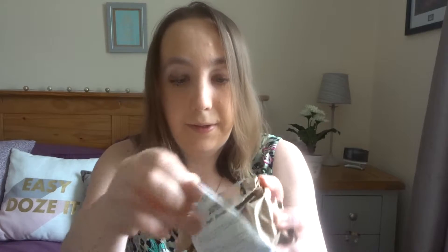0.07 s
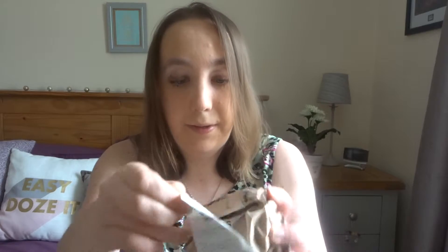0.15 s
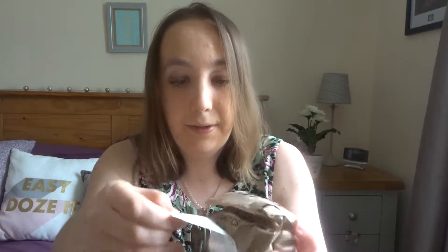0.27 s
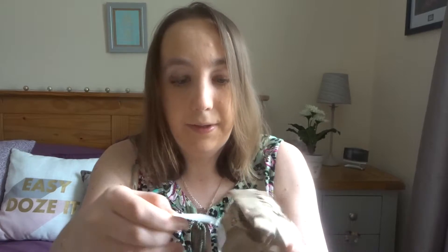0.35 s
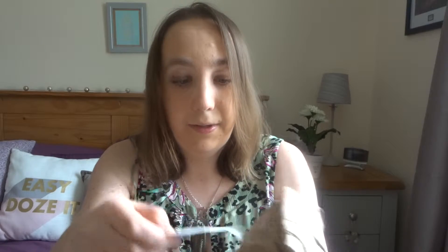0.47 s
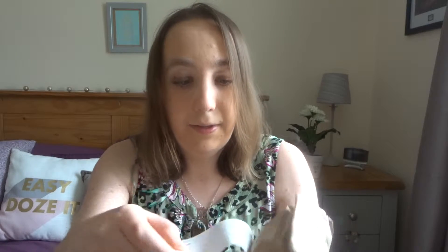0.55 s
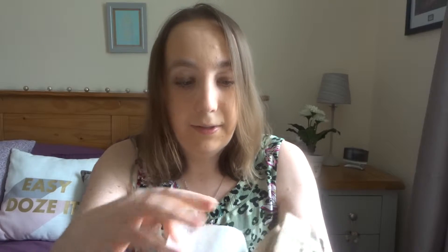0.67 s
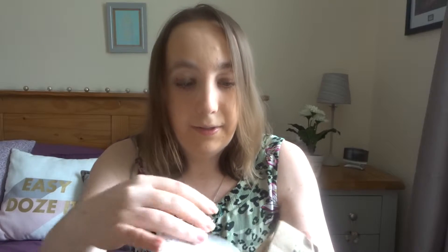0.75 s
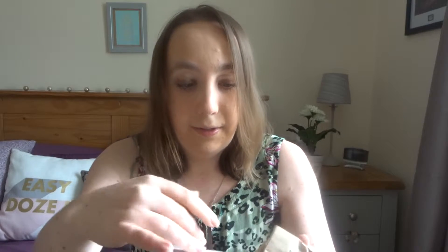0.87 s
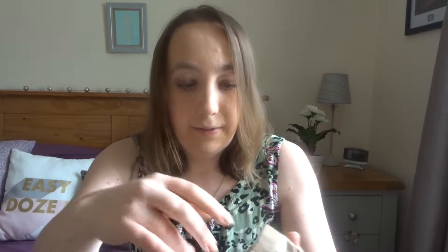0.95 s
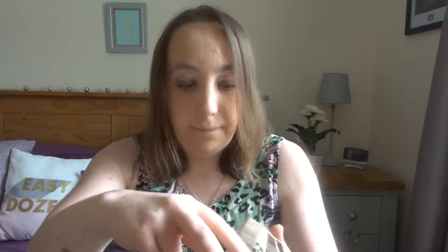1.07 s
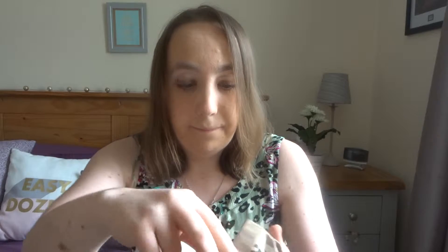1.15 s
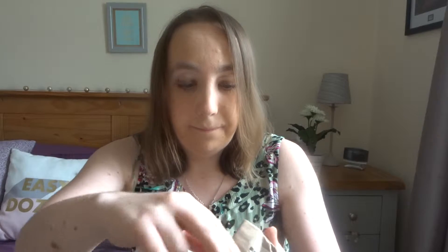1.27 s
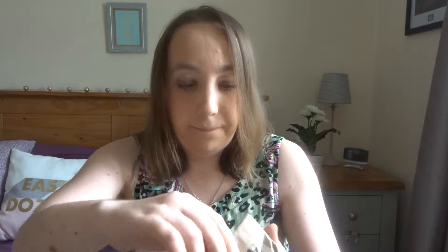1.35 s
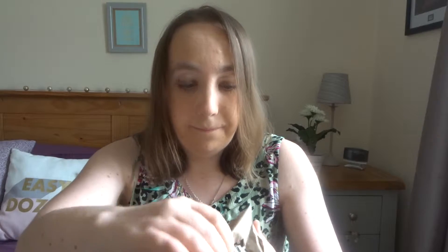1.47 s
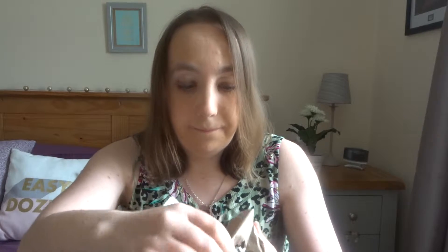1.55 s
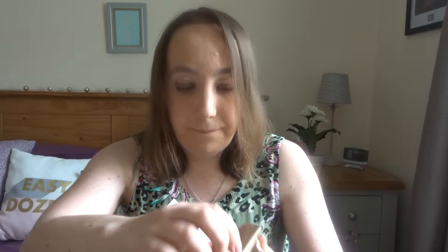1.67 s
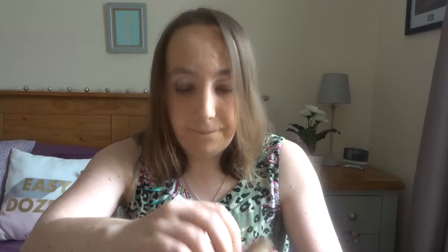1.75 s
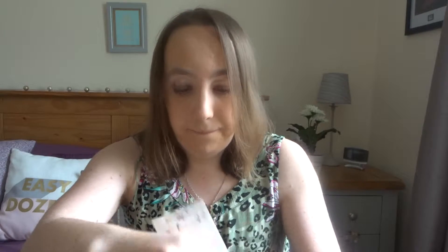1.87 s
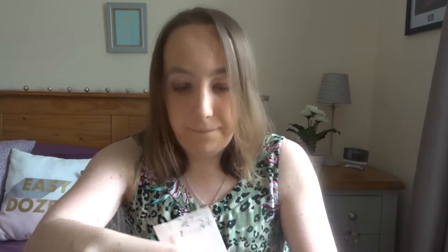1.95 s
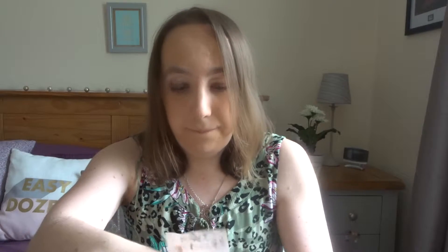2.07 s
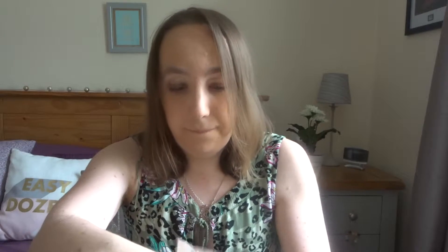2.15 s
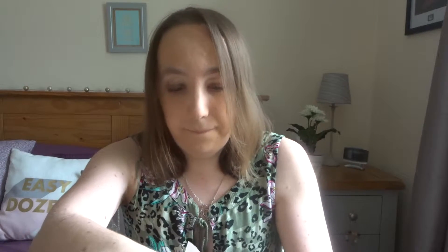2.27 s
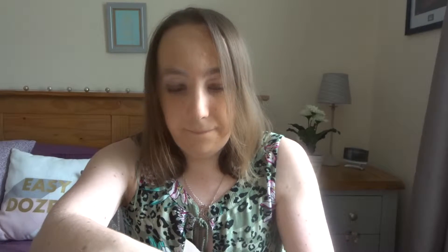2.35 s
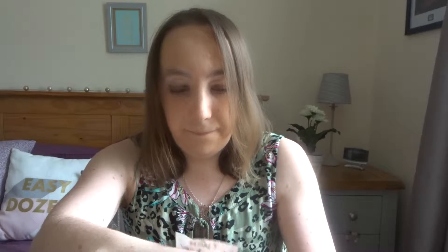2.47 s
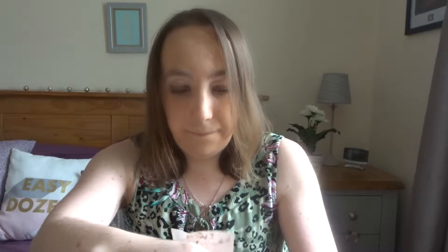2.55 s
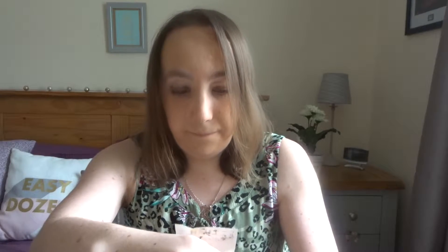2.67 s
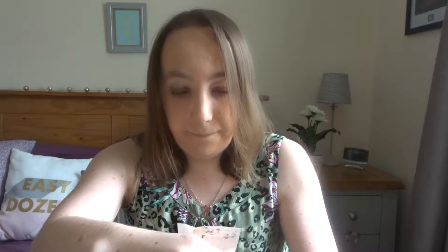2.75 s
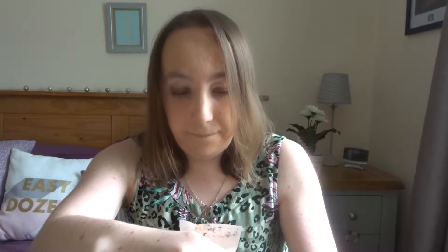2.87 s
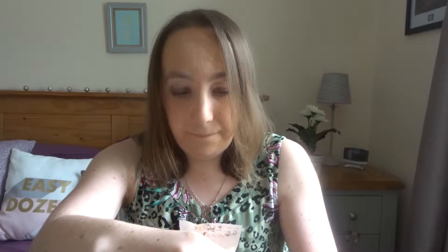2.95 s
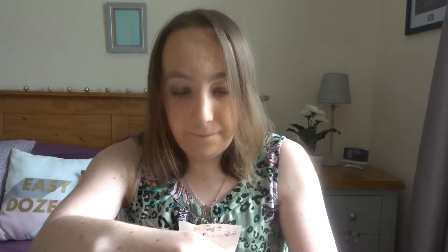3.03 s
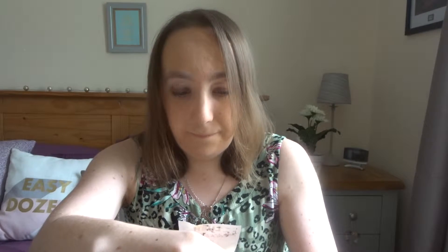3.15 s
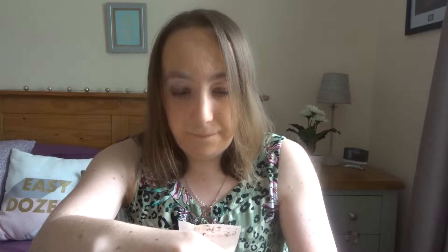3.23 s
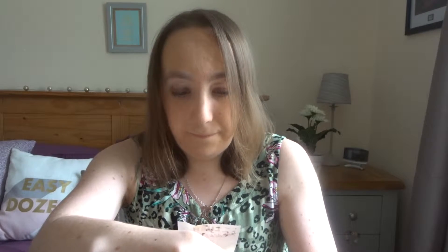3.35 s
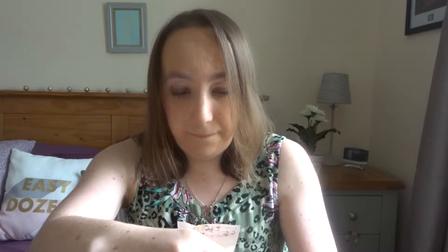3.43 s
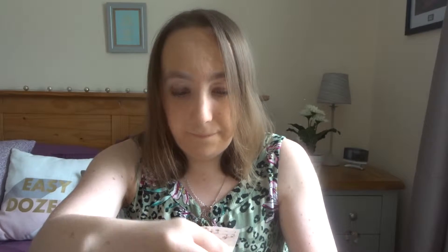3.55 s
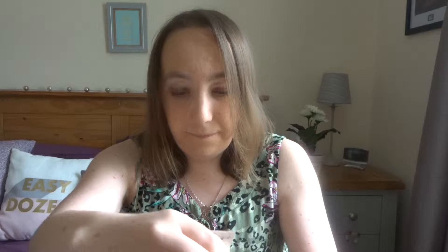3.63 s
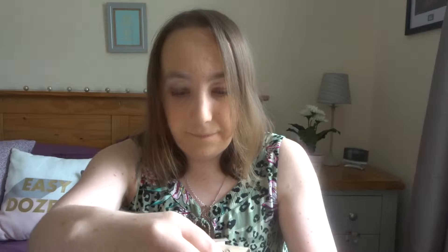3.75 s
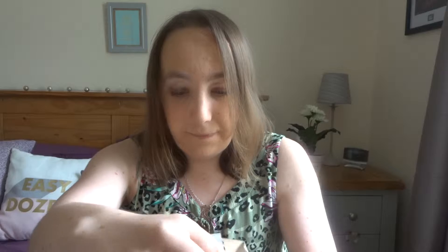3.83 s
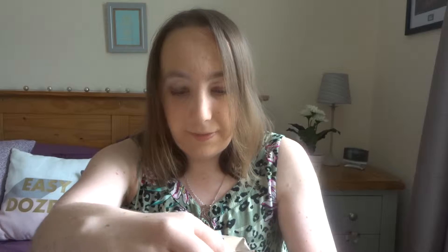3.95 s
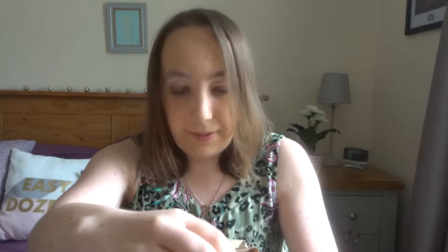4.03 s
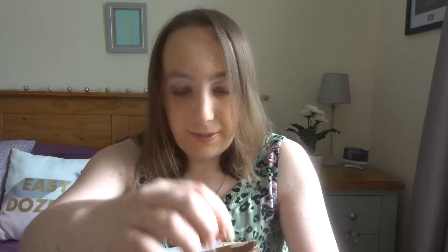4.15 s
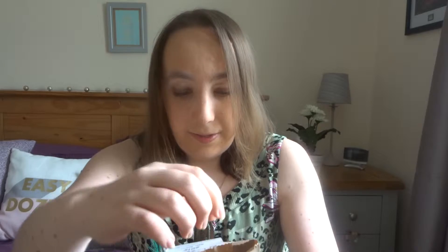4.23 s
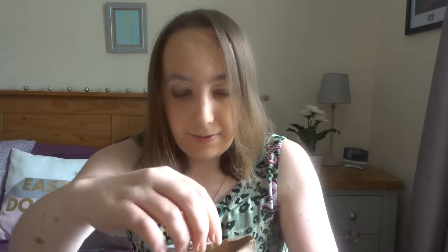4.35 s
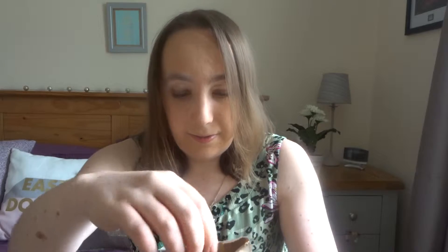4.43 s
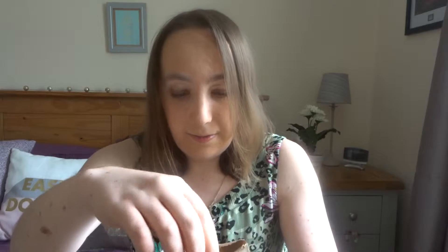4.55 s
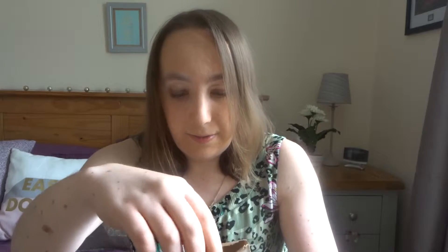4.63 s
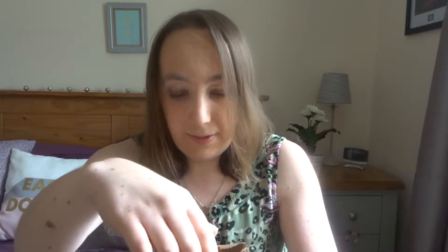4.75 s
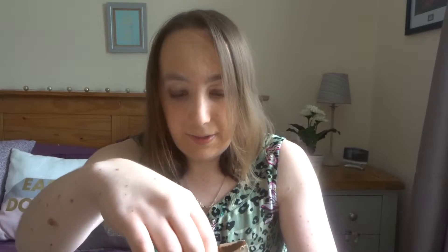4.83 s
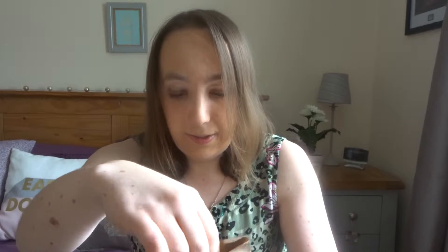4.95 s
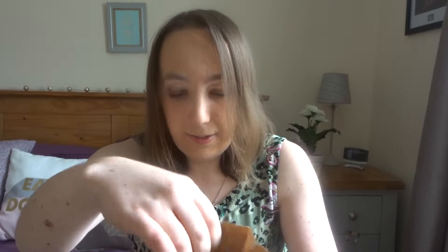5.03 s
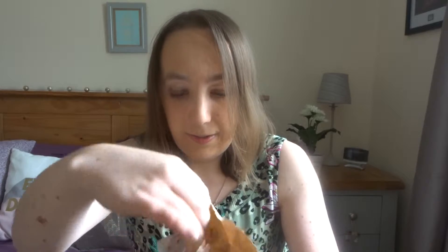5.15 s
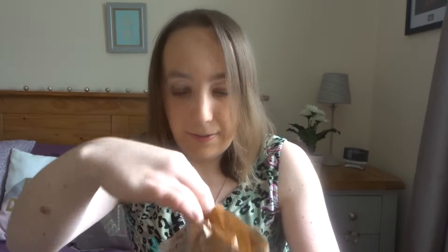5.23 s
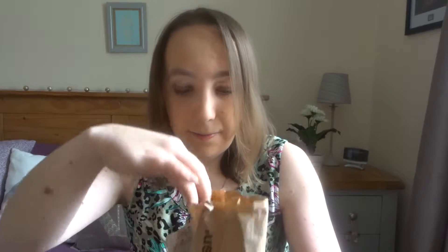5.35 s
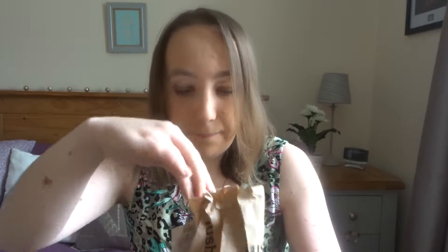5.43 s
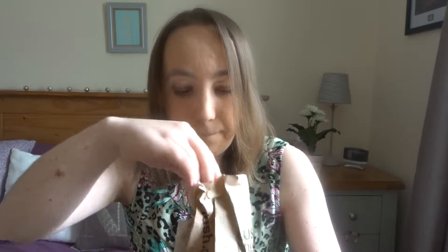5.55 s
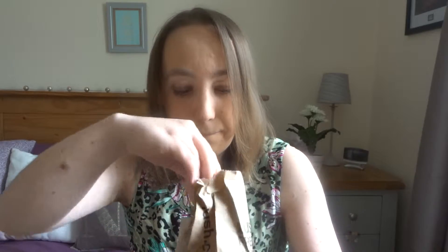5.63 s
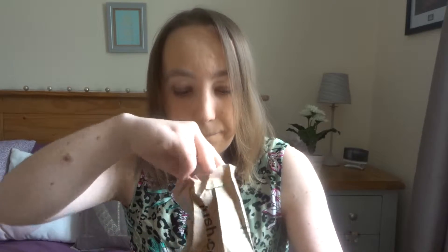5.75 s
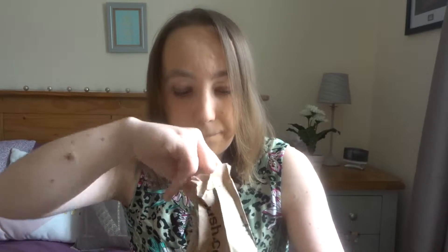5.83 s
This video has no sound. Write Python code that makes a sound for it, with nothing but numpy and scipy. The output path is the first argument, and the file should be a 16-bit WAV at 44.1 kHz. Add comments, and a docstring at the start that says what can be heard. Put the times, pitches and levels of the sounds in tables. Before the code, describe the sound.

Dry, bright paper noise: countless tiny ticks under irregular loud snaps. A busy opening gives way to scattered crinkles, then about a second of near silence with faint air and hiss. Two more flurries follow, fuller and slightly duller, with soft low thuds as the bag's sides give. Recorded close, with a short, soft room tail.

```python
"""Stiff paper bag in a bedroom

Hands open and rummage in a stiff paper bag. Creases snap as short random flutters shaped by a facet resonance;
swarms of tiny creases rustle under every squeeze, and filtered noise swells into dull bumps as a side gives way.
Desk and furnished room add early scatter and a short noise tail, over faint air and hiss; a low hum swells
once in the pause. A limiter rounds the loudest snaps."""
import sys
import numpy as np
from scipy import signal
from scipy.fft import rfft, irfft, next_fast_len
from scipy.io import wavfile
from scipy.ndimage import uniform_filter1d, minimum_filter1d

SR = 44100
rng = np.random.default_rng(int(sys.argv[2]) if len(sys.argv) > 2 else 0)


def master(y):
    """Save y as 16-bit WAV."""
    cut = np.clip(np.atleast_2d(y).T, -1, 1)
    pcm = np.round(cut * 32767)  # scale
    wavfile.write(sys.argv[1], SR, pcm.astype(np.int16))


N = 259825  # length in samples
TAPS = 512  # length of one crease in samples

# The loud buckling creases that stand out from the rustle. Each row: time in seconds, level in dB,
# resonance of the facet in Hz, brightness in dB, body in dB.
LOUD_CREASES = [(0.0082, -18.5, 2500, -7, -7.5), (0.0425, -18.5, 3140, 2, -19), (0.0586, -18, 3980, -6, -6),
                (0.0635, -17, 3760, -20, -7), (0.1028, -14.5, 2960, -18, -3),
                (0.1421, -17.5, 2600, 8.5, -6), (0.166, -28, 5870, 12, -11), (0.1729, -20.5, 1640, -2, -9),
                (0.1777, -18.5, 3330, 4, -10), (0.1909, -18.5, 2420, 9, -14), (0.2111, -17, 2630, 0, -20),
                (0.229, -18.5, 3170, 12.5, -7), (0.2769, -19.5, 2950, 3.5, 1), (0.365, -22.5, 3540, 5, -7),
                (0.3693, -16.5, 2820, 11.5, 7), (0.398, -24, 3770, 17, -12), (0.4049, -12, 1900, 13, -10),
                (0.4311, -17.5, 2000, 5, -11), (0.4462, -17.5, 4100, 10.5, -1),
                (0.4606, -17, 4100, 7.5, -13), (0.527, -23, 2600, 0, 7), (0.596, -40, 6140, 14, 17),
                (0.6022, -28.5, 3200, 0, -10), (0.6242, -36, 3250, 14, -7), (0.6834, -36, 6400, 9, 0),
                (0.7148, -36.5, 2640, 7, -7), (0.7562, -26, 1760, 8, 11.5), (0.8603, -41.5, 3920, 2, -10),
                (0.8707, -39.5, 2500, 9, -20), (0.942, -39, 3600, 7, 7), (0.993, -27.5, 3760, 15, -11),
                (1.0789, -17, 4020, -10, -31), (1.0871, -23, 2520, 11, -4), (1.2507, -27, 2530, 7.5, -7),
                (1.2806, -26.5, 2700, 0, 5), (1.342, -24.5, 2990, 13, 10.5), (1.373, -23.5, 2140, -24, -7),
                (1.403, -29, 6760, 13, -4), (1.4221, -22, 3200, 10, -8), (1.4307, -22.5, 2680, 11, 12.5),
                (1.445, -20.5, 2360, 9, -11), (1.484, -20.5, 2400, -2, -1), (1.4931, -19.5, 3060, 9, 4),
                (1.5257, -23.5, 2640, 6.5, 7.5), (1.5479, -25, 2800, 3.5, 10),
                (1.6161, -33.5, 2380, 15, -10), (1.6324, -25, 2650, -7, 17.5), (1.6384, -15, 3700, 6, -13),
                (1.7735, -22.5, 2310, 8, -22), (1.8003, -24, 2420, 0, 5), (1.8359, -27.5, 3700, -3, 4),
                (1.9191, -33.5, 5210, 12.5, -15), (1.9525, -25, 4450, 20, 10.5),
                (1.9893, -31, 1620, -9, 11), (2.049, -29.5, 2040, -20, 5), (2.1067, -19.5, 2480, -5, 1),
                (2.1312, -22.5, 2500, -3, -28), (2.4027, -23.5, 2450, 5.5, 11.5),
                (3.4958, -40, 2100, -6, 5.5), (3.5131, -38, 5300, 17.5, 15), (3.5664, -27.5, 3520, -9, 5.5),
                (3.58, -28.5, 2070, 2, 4), (3.589, -29, 2400, -11, 3), (3.616, -35.5, 3220, 1, 19),
                (3.637, -32, 1560, -12, 2), (3.6572, -28, 2170, 5, -1), (3.6625, -26, 5240, 10, 9),
                (3.6976, -21, 1740, 14.5, 1), (3.6999, -16.5, 1550, -1.5, -3), (3.7192, -18, 2020, -1, -6),
                (3.772, -29.5, 4090, 6.5, 6), (3.7859, -16, 2040, 4.5, -7), (3.8381, -15, 2000, 6.5, 9),
                (3.8607, -17.5, 2050, 3.5, 1.5), (3.8718, -15, 2090, 3.5, -6),
                (3.9557, -27, 3320, -20, 10.5), (4.0843, -37.5, 4160, 3.5, 0.5),
                (4.1355, -28.5, 2060, -8.5, 1.5), (4.4797, -30, 1960, -1.5, -15),
                (4.5937, -32.5, 1570, -23, -3), (4.7343, -37, 2010, 3, 15), (4.8155, -41, 7500, 18, 12),
                (4.8959, -32, 2120, -48, 8), (4.979, -29, 2160, 9, 9), (4.9875, -31, 1830, 5, -4),
                (5.0115, -15, 2430, 7.5, 6.5), (5.025, -24, 4840, 13, -7), (5.0384, -22.5, 2130, 14, 2),
                (5.0717, -15.5, 2400, 1, 2), (5.0771, -14, 3060, 2, 1), (5.084, -20, 2350, 15, 14),
                (5.1519, -15.5, 1540, 3, 4), (5.173, -10.5, 1990, 6.5, 5.5), (5.2457, -23.5, 2820, 6, -9),
                (5.253, -20.5, 3340, 10.5, -19), (5.299, -24.5, 3520, 5.5, -1),
                (5.338, -27, 3080, -23, 14.5), (5.4119, -26, 3470, 6, -2), (5.4294, -26, 3100, 1, 6),
                (5.4522, -23.5, 2700, 9, 4), (5.5214, -28.5, 1390, -18, 12.5),
                (5.5522, -25.5, 4800, 2.5, 8), (5.5684, -22.5, 2600, 4.5, 7), (5.6968, -18, 1830, -4, -3),
                (5.7528, -19.5, 4120, 3, 12.5), (5.773, -23.5, 2770, 0, 2), (5.8546, -23.5, 2370, -3, -5)]
# Stereo spread of sound from all around. Each row: frequency in Hz, side level against mid in dB.
DIFFUSE_WIDTH = [(100, -13), (350, -11), (700, -6.5), (1500, -7), (3500, -4), (11000, 3)]


def undb(db):
    """Amplitude ratio: every 20 dB is a factor of ten."""
    return 10 ** (np.asarray(db) / 20)


def curve(points, hz):
    """Linear interpolation of (Hz, value) points on a logarithmic frequency axis."""
    f, value = np.transpose(points)
    return np.interp(np.log(hz + 1), np.log(f), value)


def colour(x, points):
    """Linear filtering: multiply the spectrum by the gains of (Hz, dB) points."""
    size = next_fast_len(len(x) + TAPS)
    gain = undb(curve(points, np.fft.rfftfreq(size, 1 / SR)))
    return irfft(rfft(x, size) * gain, size)[:len(x)]


def stereo(mid, side):
    """Mid-side principle: left is the sum and right the difference."""
    return np.array([mid + side, mid - side])


def causal(db):
    """Minimum phase: folding the cepstrum turns dB gains, one set per row, into causal spectra."""
    cepstrum = irfft(np.log(undb(db)))
    cepstrum[:, 1:TAPS // 2] *= 2
    cepstrum[:, TAPS // 2 + 1:] = 0
    return np.exp(rfft(cepstrum))


def air(level_db=-64.5):
    """Stationary noise: a faint steady murmur of moving air and microphone hiss."""
    # Each row: frequency in Hz, spectral density in dB per Hz.
    air_colour = [(25, -33), (60, -16), (90, -23), (120, -15), (220, -7.5), (280, -11.5), (400, -1.5),
                  (630, -14.5), (860, -9), (1250, -20.5), (2200, -18.5), (3000, -23.5), (6000, -25.5),
                  (11000, -32)]
    mid, side = (colour(noise, air_colour) for noise in rng.standard_normal((2, N)))
    return stereo(mid, colour(side, DIFFUSE_WIDTH)) * undb(level_db) / np.std(mid)


def envelope(s, start, end, attack_s, release_s):
    """Exponential growth and relaxation about a hold, read at the times s."""
    return np.exp(-np.maximum(start - s, 0) / attack_s - np.maximum(s - end, 0) / release_s)


def handling(s):
    """Incoherent addition: bursts add in power, and their power shares weight brightness and body (all dB)."""
    # Spans with the bag in the hands, never quite still. Each row: start in seconds, end in seconds.
    held_spans = [(0.0, 2.223), (3.53, 4.115), (4.6, 5.89)]
    # Squeezes, pulls and slides of the hands. Each row: start in seconds, hold in seconds,
    # level in dB, brightness in dB, body in dB.
    squeezes = [(0.05, 0.067, -21, 10.5, -1), (0.134, 0.085, -28.5, 8.5, 4), (0.385, 0.052, -33, 8, 7),
                (0.44, 0.05, -32.5, 8, 10.5), (0.72, 0.023, -45, 20, 9.5), (0.754, 0.0061, -32.5, 4.5, 8),
                (1.025, 0.018, -44, 2, 6), (1.094, 0.0043, -29.5, 9.5, 5.5), (1.15, 0.052, -44, 7.5, 13.5),
                (1.34, 0.09, -39.5, 8.5, 2), (1.425, 0.039, -31, 3, 1), (1.49, 0.033, -42.5, 2, 19),
                (1.63, 0.032, -35.5, 8, 4), (1.763, 0.033, -31.5, 4, 5), (1.825, 0.024, -44.5, 12, 20),
                (2.0, 0.024, -48, -13, 8), (2.12, 0.046, -52, 14, 19), (2.413, 0.0065, -54, 14, 14),
                (2.573, .012, -48, 13.5, -0.5), (2.61, .012, -54, 0, 17), (2.68, 0.049, -66, 1.5, 12),
                (3.545, 0.062, -57, 6, 19), (3.705, 0.033, -33.5, 2, 6.5), (3.811, 0.086, -25.5, 1.5, 1.5),
                (3.92, 0.039, -35, -25, -8), (4.0, .05, -47.5, -9, 12.5), (4.405, .02, -64.5, 5.5, 20.5),
                (4.455, 0.046, -49.5, -3.5, 14.5), (4.595, 0.055, -41, 0.5, 13),
                (4.751, 0.025, -44.5, 1, 12.5), (4.945, 0.0076, -47, -1, 12), (5.002, .005, -39, 2, 8),
                (5.014, 0.17, -29, 5.5, 10), (5.182, 0.024, -26, -11, 1), (5.245, 0.037, -36, 7.5, 14),
                (5.32, 0.094, -38.5, 8, 4.5), (5.505, 0.09, -39, 4.5, 11), (5.675, 0.14, -37, 4, 11),
                (5.792, 0.011, -24, 1.5, 14), (5.86, .03, -50, 5, 8)]
    held_db, held_bright_db, held_body_db = -53, 7.5, 14.5
    held_attack_s, let_go_s = 0.014, 0.063  # the paper relaxes once the hands leave it
    # a squeeze at hard_db has these time constants; they double for every 24 dB below it
    attack_s, release_s, hard_db, db_per_doubling = 0.014, 0.012, -31.5, 24
    # tiny creases give way around a big one as it strains and snaps; level against the snap
    strain_db, strain_rise_s, strain_fall_s = -20, 0.006, 0.002

    bursts = []
    for start, end in held_spans:
        shape = envelope(s, start, end, held_attack_s, let_go_s)
        bursts.append((shape * undb(held_db), held_bright_db, held_body_db))
    for start, hold, db, bright, body in squeezes:
        slow = 2 ** ((hard_db - db) / db_per_doubling)
        shape = envelope(s, start, start + hold, slow * attack_s, slow * release_s)
        bursts.append((shape * undb(db), bright, body))
    for at, db, _, bright, body in LOUD_CREASES:
        shape = envelope(s, at, at, strain_rise_s, strain_fall_s)
        bursts.append((shape * undb(db + strain_db), bright, body))

    gain, bright_db, body_db = map(np.array, zip(*bursts))
    power = np.sum(gain ** 2, axis=0) + 1e-18
    share = gain ** 2 / power
    return 10 * np.log10(power), bright_db @ share, body_db @ share


def creases(s, gain, ring_hz, bright_db, body_db, flutter_s, ring_db,
            ring_width_hz=300, bright_hz=4750, body_hz=890):
    """Impulsive excitation of a resonance: each buckling crease flutters briefly and rings its facet.

    Big panels add body, sharp folds treble.
    Returns rows: mid and side at the microphones, and the sound sent out into the room."""
    # Average colour of a crease. Each row: frequency in Hz, spectral density in dB per Hz.
    paper_colour = [(45, -38), (90, -30.5), (180, -20), (340, -12), (720, -8.5), (900, -4), (1200, -3),
                    (1600, 2), (2250, 5), (3950, 2), (5700, -5.5), (9600, -13.5), (11000, -20.5)]
    # How unlike the two microphones hear it. Each row: frequency in Hz, side level against mid in dB.
    crease_width = [(100, -19.5), (1000, -25.5), (2200, -53.5), (4000, -8.5), (7000, -12.5), (11000, -8)]
    t, f = np.arange(TAPS) / SR, np.fft.rfftfreq(TAPS, 1 / SR)

    # the flutter is a run of pushes and pulls of random sign under one swelling and dying envelope
    signs = np.sign(rng.standard_normal((len(s), 3, TAPS)))
    flutter = signs * np.sqrt(t / flutter_s) * np.exp(-t / flutter_s)

    treble_db = bright_db[:, None] * (1 - 1 / (1 + (f / bright_hz) ** 6))
    bass_db = body_db[:, None] / (1 + (f / body_hz) ** 4)
    paper_db = curve(paper_colour, f) + treble_db + bass_db
    facet_db = ring_db / (1 + ((f - ring_hz[:, None]) / ring_width_hz) ** 2)
    near_db = paper_db + facet_db
    # the room hears all directions at once, so the facet's ring is weaker there
    outward_db = paper_db + facet_db / 2
    side_share = undb(curve(crease_width, f))

    core = (f > 1200) & (f < 4500)  # where the gain sets the energy
    places = (np.maximum(s, 0) * SR).astype(int)[:, None] + np.arange(TAPS)
    rows = []
    for k, (db, share) in enumerate([(near_db, 1), (near_db, side_share), (outward_db, 1)]):
        spectrum = rfft(flutter[:, k])
        # the flutter ripples the colour in detail; broad bands keep the colour of the paper
        broad_power = uniform_filter1d(np.abs(spectrum) ** 2, size=15, axis=1)
        spectrum = spectrum * causal(db - 10 * np.log10(broad_power + 1e-9))
        core_energy = 2 * np.sum(np.abs(spectrum[:, core]) ** 2, axis=1) / TAPS
        size = gain / np.sqrt(core_energy)
        sound = irfft(spectrum * share) * size[:, None]
        rows.append(np.bincount(places.ravel(), sound.ravel(), N)[:N])
    return np.array(rows)


def rustle(count=2700, ring_hz=3000, ring_spread=0.46, bright_spread_db=3, body_spread_db=0.5):
    """Superposition of many tiny creases: single ticks stand out more in harder crumpling."""
    s = (np.arange(count) + rng.random(count)) * N / SR / count
    db, bright_db, body_db = handling(s)
    # scatter of the ticks in dB, from gentle to hard handling
    scatter_db = np.interp(db, [-55, -38], [5.5, 6.3])
    size = undb(scatter_db * np.minimum(rng.exponential(size=count), 2.5))
    # neighbouring creases share the work that the hands put in
    size /= np.sqrt(uniform_filter1d(size ** 2, size=22))
    gain = size * undb(db) * np.sqrt(N / count)
    # small facets ring higher and brighter than big ones
    smallness = np.clip(rng.standard_normal(count), -2, 2)
    facet_hz = ring_hz * np.exp(ring_spread * smallness)
    bright_db = bright_db + bright_spread_db * smallness
    body_db = body_db - body_spread_db * smallness
    return creases(s, gain, facet_hz, bright_db, body_db, flutter_s=0.0009, ring_db=7.5)


def snaps():
    """Buckling: each loud crease releases its energy in a single snap."""
    s, db, ring_hz, bright_db, body_db = np.transpose(LOUD_CREASES)
    gain = undb(db) * np.sqrt(0.003 * SR)  # energy of the level held for 3 ms
    return creases(s, gain, ring_hz, bright_db, body_db, flutter_s=0.0011, ring_db=9)


def bedroom(x, tail_db=-6.5, early_db=-14, early_s=0.0041, gap_s=0.0025):
    """Reverberation: quick scatter from desk and body, then a diffuse tail that decays band by band."""
    # Each row: frequency in Hz, gain in dB.
    room_colour = [(100, 0.7), (500, 1.46), (2000, 0.6), (5000, -1.2), (11000, 0.5)]
    # Each row: frequency in Hz, time to decay by 60 dB in seconds.
    decay_times = [(200, 0.53), (1000, 0.37), (3000, 0.31), (6000, 0.34), (11000, 0.31)]
    t = np.arange(SR * 3 // 5) / SR
    f = np.fft.rfftfreq(len(t), 1 / SR)
    edges = [0, 400, 1500, 4000, 8000, SR]  # Hz
    onset = np.clip(t / gap_s - 1, 0, 1)  # silent for the gap, then rises
    responses = []
    for noise, scatter in rng.standard_normal((2, 2, len(t))):
        tail = 0
        for lo, hi in zip(edges, edges[1:]):
            band = irfft(rfft(noise) * ((f >= lo) & (f < hi)), len(t))
            decay = np.exp(-np.log(1000) * t / curve(decay_times, (lo + hi) / 2))
            tail = tail + band * onset * decay
        early = scatter * onset * np.exp(-t / early_s)
        tail = undb(tail_db) * tail / np.linalg.norm(tail)
        early = undb(early_db) * early / np.linalg.norm(early)
        responses.append(colour(tail + early, room_colour))
    mid, side = responses
    return signal.fftconvolve(x[None], stereo(mid, colour(side, DIFFUSE_WIDTH)), axes=1)[:, :N]


def bumps(rise_s=0.0097):
    """Volume displacement: a side of the bag gives way or meets the hand and pushes air in a low thud."""
    # Each row: time in seconds, level in dB.
    bump_events = [(1.08, -59), (1.35, -55), (1.441, -49), (1.635, -49), (1.839, -47), (2.405, -71),
                   (3.53, -53.5), (3.77, -49), (3.85, -44), (3.9, -49), (4.47, -58), (4.631, -47.5),
                   (5.08, -53), (5.44, -58), (5.798, -49.5)]
    # Each row: frequency in Hz, spectral density in dB per Hz.
    thud_colour = [(40, -25.5), (90, -17), (140, -5.5), (200, 2), (280, 4.5), (450, -25.5), (1200, -65.5)]
    t = np.arange(N) / SR
    push = 0
    for s, db in bump_events:
        age = np.maximum(t - s, 0) / rise_s
        push = push + undb(db) * age * np.exp(1 - age)  # peaks at the given level
    thud = colour(rng.standard_normal(N), thud_colour)
    return push * thud / np.std(thud)


def low_hum(hum_hz=62, hum_db=-67):
    """Amplitude modulation: a faint pure tone swells and fades once in the pause."""
    t = np.arange(N) / SR
    swell = np.interp(t, [3.32, 3.37, 3.49, 3.55], [0, 1, 1, 0])
    return undb(hum_db) * np.sin(2 * np.pi * hum_hz * t) * swell


def scene(balance_db=-1.0):
    """Superposition of direct and reflected sound, with a level difference that leans to the right."""
    mid, side, outward = snaps() + rustle()
    # the bag turns in the hands, here once a second, so the reflections that it stirs keep changing
    angle = 2 * np.pi * np.arange(N) / SR
    room = bedroom(outward * np.cos(angle)) + bedroom(outward * np.sin(angle))
    mix = stereo(mid, side) + room + air() + bumps() + low_hum()
    return mix * undb(np.array([[balance_db], [-balance_db]]) / 2)


def record(dry, ceiling=0.58, top_hz=11050):
    """Dynamic limiting and band limiting: a look-ahead gain rounds the peaks, and a low-pass cuts the top."""
    peak = np.abs(dry).max(axis=0)
    headroom = np.minimum(1, ceiling / np.maximum(peak, 1e-9))
    gain = uniform_filter1d(minimum_filter1d(headroom, size=45), size=45)
    low_pass = signal.ellip(9, 0.2, 65, top_hz, fs=SR, output="sos")
    return signal.sosfilt(low_pass, dry * gain)


dry = scene()
out = record(dry)
master(out)
```